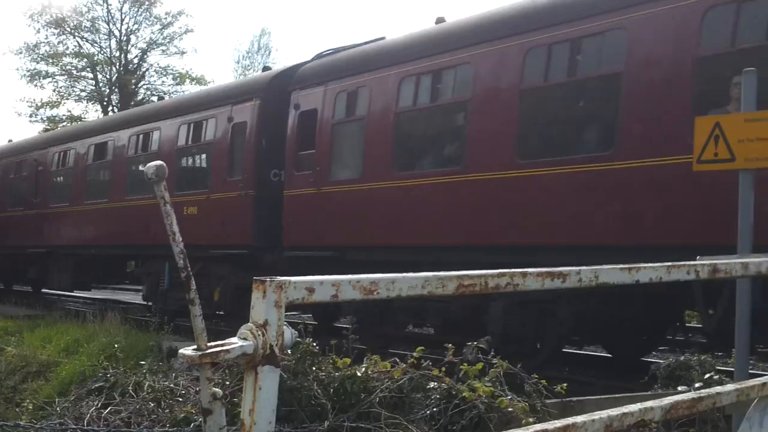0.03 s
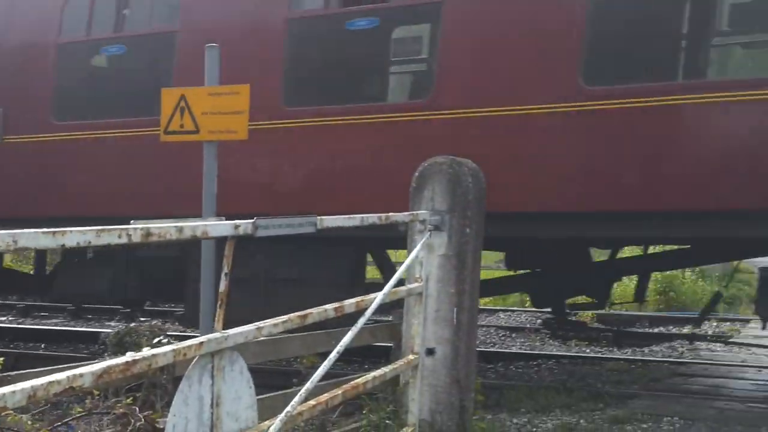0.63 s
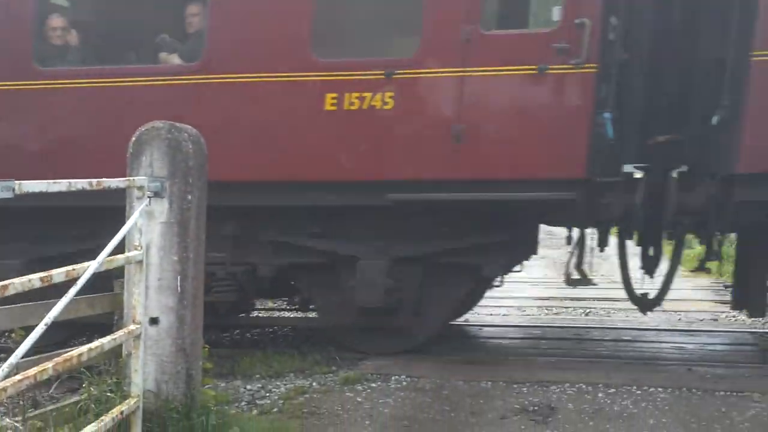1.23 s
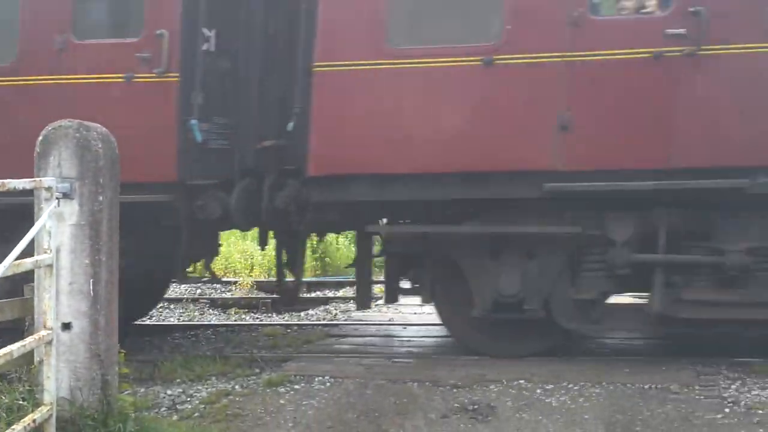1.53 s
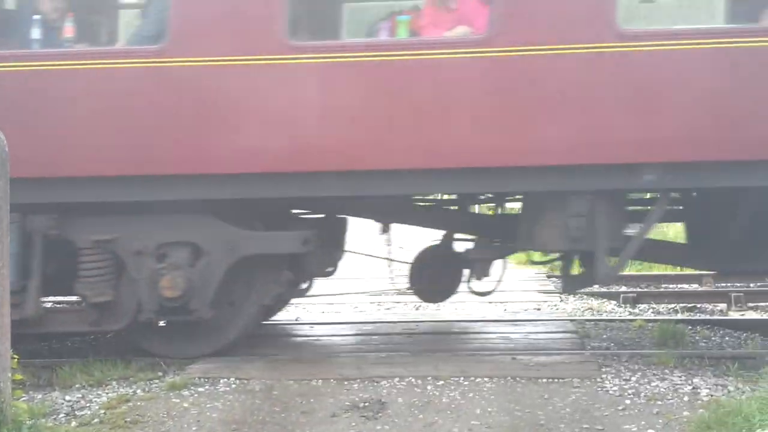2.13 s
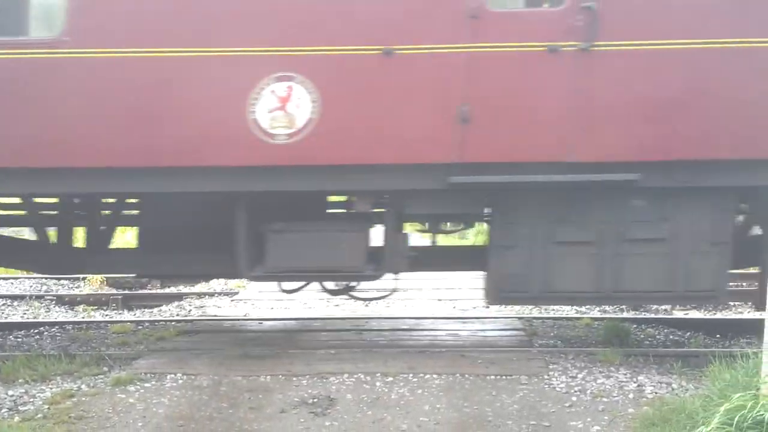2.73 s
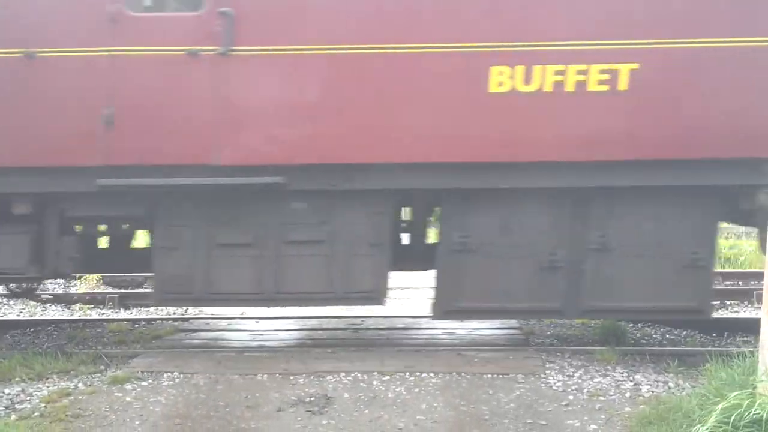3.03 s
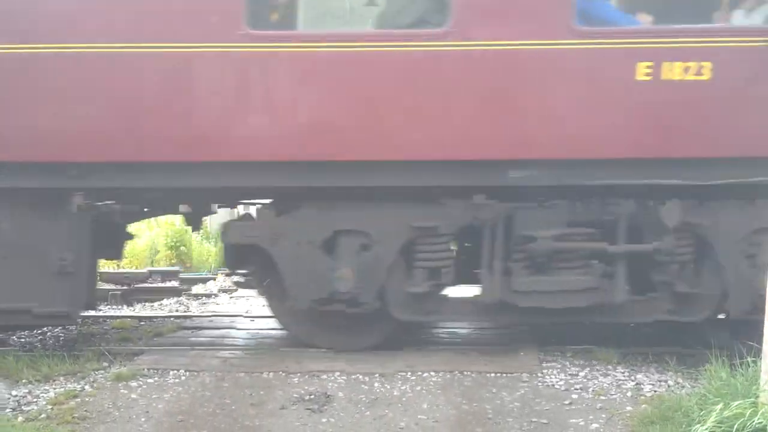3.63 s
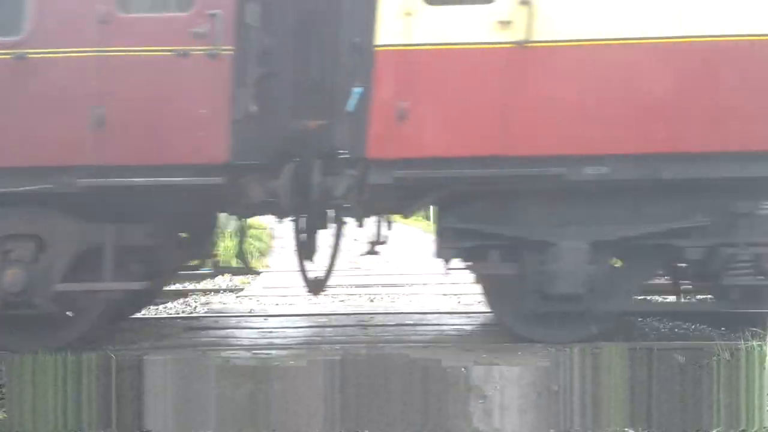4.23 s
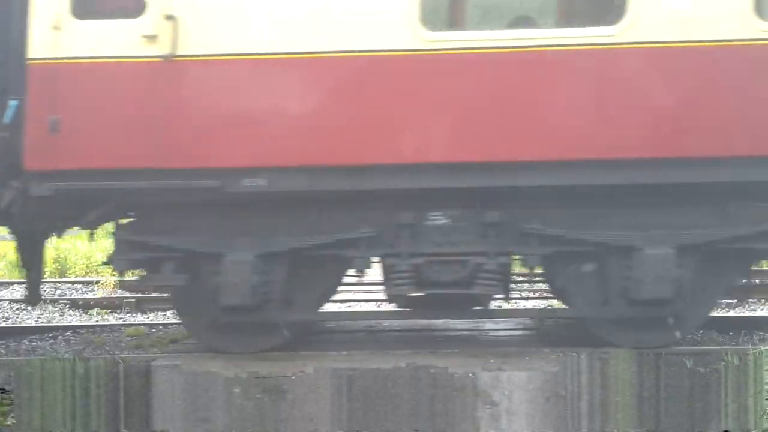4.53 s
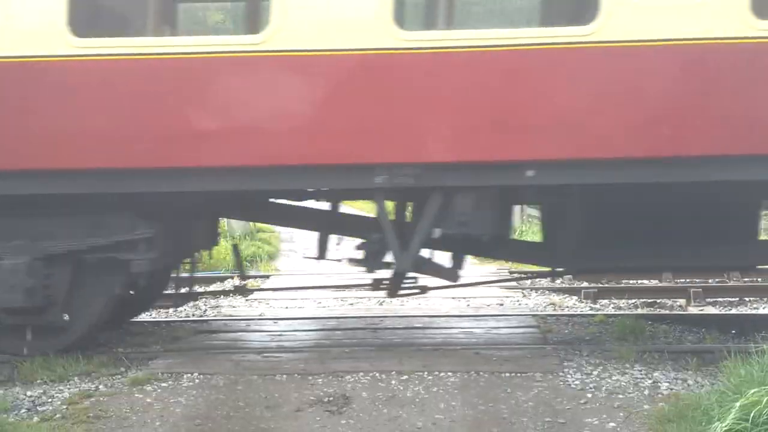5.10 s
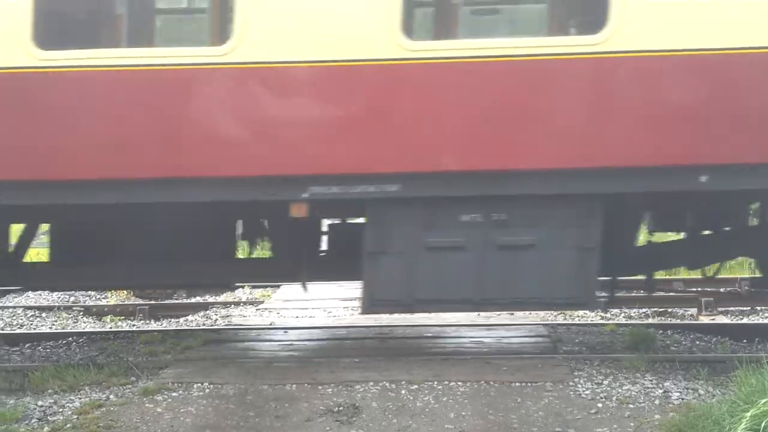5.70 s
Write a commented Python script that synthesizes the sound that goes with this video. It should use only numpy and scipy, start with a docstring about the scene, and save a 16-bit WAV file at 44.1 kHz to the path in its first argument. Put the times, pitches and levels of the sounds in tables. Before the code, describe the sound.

Railway carriages roll past outdoors, about three metres away, making a continuous low rumble and roar with a light, gritty steel hiss for nearly six seconds. Wheels strike a rail joint at about 0.3, 0.6, 1.1 and 1.5 seconds. Each hit is a sharp clack with a low thump and a short metallic ring, and the roar swells as each wheel passes. Around 2 seconds the clacking pauses and a low hum from the rails rises. A second group of four clacks lands at about 3.2, 3.6, 4.1 and 4.4 seconds, the first the hardest. Softer knocks from loose fittings, brief wheel scrapes and a few faint, thin squeaks are scattered throughout. From about 4.7 to 5.1 seconds come light knocks, low booms and short ringing wheel tones, then the rolling continues a little quieter to the end.

```python
"""Railway carriages roll over a level crossing a few metres away, at seven metres a second.
In the first second and a half four wheels strike a rail joint; each impact excites a clack and the
wheel's modes, whose pitch sinks by the Doppler effect. Near two seconds the rail's drone swells.
From about three seconds four more wheels strike; the last knocks and brief wheel tones follow.
Throughout, rolling contact makes the track roar and rumble and the treads hiss."""
import sys
import numpy as np
from scipy import signal
from scipy.io import wavfile
from scipy.ndimage import uniform_filter1d, minimum_filter1d

SR = 44100
rng = np.random.default_rng(int(sys.argv[2]) if len(sys.argv) > 2 else 0)


def wav_out(sig):
    """Save sig, one row per channel (or a flat mono array), as 16-bit PCM at SR to the path in sys.argv[1]."""
    wavfile.write(sys.argv[1], SR, np.round(np.clip(np.atleast_2d(sig).T, -1, 1) * 32767).astype(np.int16))


N = 254016
TIME = np.arange(N) / SR

# one row per wheel: joint_s, blow_db, blow_tilt_db_per_octave, hold_s, pitch_ratio, low_pitch_ratio,
# radial_pitch_ratio, clang_db, lead_hz, ring_tilt_db_per_octave, low_modes_db, ring_db, shake_db
WHEEL_PASSES = [(0.2572, -15.5, 0.2, 0.018, .984, .994, 1.0, -21, 3580, 3.5, 1, -36.5, -11.5),
                (.640, -16.5, 1.5, 0.026, .997, .985, 1.008, -24.5, 2024, 0, -.5, -27.5, -0.5),
                (1.1436, -12.5, 1.4, 0.011, .995, .98, 1.008, -24, 2080, -3.5, -0.5, -28, -6.5),
                (1.5227, -16, 0.6, 0.02, 1.0, .985, 0.92, -25.5, 2080, 1.5, .5, -28.5, 0),
                (3.1986, -10, 1.6, 0.0089, 1.012, 1.045, 1.02, -20, 2490, 1.5, -6, -28, -2.5),
                (3.569, -12.5, 1, 0.017, 1.012, 1.03, 1.024, -28, 2440, -0.5, 1, -25, 1.5),
                (4.0601, -15, 1.5, 0.015, 1.002, 1.02, .972, -20, 1840, -1.5, 2.5, -26, 2.5),
                (4.4296, -15, .5, 0.027, .987, .985, .966, -20, 1310, 0.5, 2.5, -28, 2)]
# modes of a steel wheel: pitch_hz, width_hz, rolling_db, struck_db
STEEL_MODES = [(1166, 240, -13, -22.5), (1319, 37.5, 1, 2.5), (1377, 43, -6.5, -11), (1828, 21.6, .5, -2.5),
               (2043, 31, -1.5, -12), (2424, 29, -4, -9.5), (2560, 48, -9.5, -12), (3112, 28, -9, -5.5),
               (3310, 20, -18, -17), (3590, 18, -14.5, -12.5), (3790, 37, -13, -14),
               (3864, 15, -12.5, -7.5), (4410, 53, -17, -13), (5400, 30, -20.5, -15.5),
               (6050, 30, -22.5, -11.5)]
# ring time of the struck track: frequency_hz, t60_s
TRACK_DECAY = [(60, 0.16), (200, 0.4), (600, 0.29), (2000, 0.15), (6000, 0.24), (8000, 0.21), (10500, 0.1)]
# modes of the rail end: pitch_hz, width_hz, gain_db
RAIL_END_MODES = [(577, 38, -0.5), (710, 85, -1.5), (940, 135, 0.5), (1460, 640, 5), (2080, 210, 1),
                  (3000, 190, -8), (4280, 220, -3), (5860, 140, 1)]
# modes of the track bed: pitch_hz, level_db, t60_s
BED_MODES = [(68, -21.5, 0.14), (135.6, -13.5, 0.18), (160, -8.5, 0.13), (285, -4, 0.035)]
# tread and flange slam onto the next rail and rebound: start_s, level_db, centre_hz
REBOUNDS = [(.2605, -14, 780), (.2615, -7, 2220), (.266, -14, 3380), (.283, -14.5, 3100), (.642, -17, 1500),
            (.649, -14, 2200), (.667, -12, 600), (1.146, -9, 875), (1.151, -6.5, 1320), (1.527, -11, 1440),
            (3.2005, -2.5, 680), (3.216, -10, 674), (3.573, -5, 1790), (3.575, -13, 746), (4.062, -7, 1390),
            (4.4315, -7, 700), (4.436, -7, 1300)]
# knocks of loose links: start_s, level_db, centre_hz
LINK_KNOCKS = [(.05, -28, 590), (.3805, -12.5, 705), (0.576, -16, 500), (0.737, -19, 745),
               (.895, -21, 1580), (1.09, -22, 1310), (1.268, -14.5, 650), (2.416, -25, 720),
               (2.743, -24, 570), (2.953, -20.5, 690), (3.322, -19, 635), (3.81, -21, 615),
               (3.928, -26, 2200), (4.163, -14, 565), (4.662, -19, 615), (4.763, -22.5, 4130),
               (5.079, -19, 720), (5.691, -21, 490)]
# a flange brushes the rail: peak_s, level_db
FLANGE_SCRAPES = [(.01, -28.5), (.41, -30.5), (.92, -31.5), (1.057, -31), (1.325, -23), (2.18, -25.5),
                  (3.304, -27)]
# resonances of the rubbing flange: pitch_hz, width_hz, gain_db
FLANGE_MODES = [(2060, 1450, -0.5), (3800, 1100, -5.5), (6130, 1800, -1.5)]
# the wheels ring out in brief hoarse tones, with a few thin high squeaks:
# peak_s, level_db, pitch_hz, half_length_s, width_hz
WHEEL_RINGS_AND_SQUEAKS = [(.01, -27, 1340, 0.02, 220), (0.32, -29, 2380, .016, 220),
                           (0.855, -40.5, 8330, .019, 120), (.995, -30, 2080, 0.022, 100),
                           (1.05, -34, 2540, .025, 160), (1.347, -32, 8340, 0.013, 120),
                           (1.798, -29, 1356, .04, 70), (2.0, -31, 2410, 0.017, 200),
                           (3.305, -25.5, 2430, 0.036, 300), (4.804, -25.5, 1828, 0.02, 70),
                           (4.846, -28, 1317, 0.05, 55), (4.995, -36, 3700, 0.036, 300),
                           (5.05, -33, 1800, .03, 60)]
# note of the rail's drone: time_s, pitch_hz
DRONE_NOTE = [(0, 189), (.45, 194), (.6, 186), (.8, 191), (1.02, 187), (1.2, 195), (1.42, 180), (1.7, 189),
              (1.95, 190), (2.2, 198), (2.4, 191), (2.7, 194), (2.86, 188), (3.26, 198), (3.55, 189),
              (3.85, 192), (4.3, 188), (4.5, 186), (4.6, 199), (4.8, 175), (5.1, 192), (5.76, 182)]
# brief swells of the low boom: peak_s, level_db, pitch_hz, half_length_s
BOOM_SURGES = [(.285, -23, 160, 0.015), (1.55, -32, 55, .05), (1.56, -23.5, 241.4, 0.073),
               (3.228, -17, 149.8, 0.016), (3.69, -23.5, 218, 0.034), (4.18, -21.5, 273, 0.024),
               (4.45, -30, 61.8, .03), (4.654, -26, 85.3, .014), (4.66, -17.5, 216, 0.021),
               (4.92, -16.5, 165, 0.033), (4.96, -19.5, 257.3, 0.02), (5.09, -17, 217.8, 0.029),
               (5.42, -24, 220.4, 0.044)]
# steady resonances of the rails: pitch_hz, width_hz, level_db
RAIL_RESONANCES = [(289, 10.8, -35), (3090, 920, -45.5)]
# spectra of joint, sleepers, rails, treads and ground: frequency_hz, relative_density_db
CLACK_SPECTRUM = [(30, -10), (70, -0.5), (150, 3.5), (300, -12), (430, 0.5), (600, 9), (900, -2.5),
                  (1500, -3.5), (2400, -5), (3600, -9.5), (4800, -11), (6400, -8), (8000, -25),
                  (11500, -15.5)]
SLEEPER_SPECTRUM = [(70, -35), (110, -10.5), (145, 2.5), (190, 4), (240, -2.5), (300, -11), (420, -28.5),
                    (800, -49)]
ROAR_SPECTRUM = [(170, -10.5), (280, 7), (400, 2), (560, -1), (750, -1), (1000, -13.5), (1250, -13.5),
                 (1600, -15), (2100, -11.5), (2800, -22.5), (4500, -26.5)]
HISS_SPECTRUM = [(1200, -3), (2200, 2), (3000, -1.5), (3900, -0.5), (4800, -7), (5600, -4.5), (6500, 2.5),
                 (7500, -8), (8700, -15), (10000, -1), (12000, -25.5)]
GROUND_SPECTRUM = [(20, -1.5), (35, 3), (60, 6.5), (100, 5.5), (160, -9.5), (300, -42.5)]
# envelopes of rail drone, tread hiss and ground rumble: time_s, gain_db
DRONE_ENVELOPE = [(0.0, -33), (.5, -37), (.6, -18), (.7, -24.5), (1.04, -25.5), (1.2, -19), (1.35, -32),
                  (1.73, -23), (1.92, -14.5), (2.05, -21), (2.17, -19.5), (2.32, -23.5), (2.69, -21),
                  (2.85, -27), (3.4, -30), (3.55, -17), (3.66, -26.5), (3.85, -30.5), (4.14, -27),
                  (4.25, -14.5), (4.42, -15.5), (4.55, -22), (4.7, -32), (4.82, -19), (5.0, -29),
                  (5.76, -29)]
HISS_ENVELOPE = [(0.0, -34), (0.99, -33.5), (1.88, -30.5), (2.77, -33.5), (3.37, -31.5), (4.67, -35),
                 (5.47, -38), (5.76, -37)]
GROUND_ENVELOPE = [(0.0, -35), (1.41, -33.5), (2.44, -40), (3.03, -35.5), (4.64, -36), (5.12, -41),
                   (5.76, -34.5)]

TRAIN_M_PER_S, SOUND_M_PER_S, TRACK_DISTANCE_M = 7.0, 343, 3.001
JOINT_LEAD_S = .42   # a wheel meets the joint this long before it is nearest
CONTACT_RISE_S = .0007


def wheels(blow_db, blow_t60, uneven_db, pits_db, afar_db):
    """Forced vibration: roughness and the joint drive each wheel's modes; Doppler shift lowers them."""
    mode_hz, widths, rolling_db, struck_db = np.transpose(STEEL_MODES)
    low, radial = mode_hz < 1600, abs(mode_hz - 2080) < 150
    out = np.zeros(N)
    for (s, db, _, _, pitch, low_pitch, radial_pitch,
         clang_db, lead_hz, tilt, low_db, ring_db, _) in WHEEL_PASSES:
        own_hz = mode_hz * np.select([low, radial], [low_pitch, radial_pitch], pitch)
        heard = np.hypot(nearness(s), from_db(afar_db))   # a far wheel still rings faintly
        rolling = heard * from_db(ring_db + uneven_db * drift(11.4) + pits_db * drift(30))
        force = rng.standard_normal(N) * (rolling + from_db(db + blow_db) * blow(s, 0.00037, blow_t60))
        gains = from_db(rolling_db + tilt * np.log2(mode_hz) + low_db * low)
        gains /= np.sqrt(np.sum(gains ** 2 * np.pi * widths / SR))   # unit force gives unit power
        ring = sum((-1) ** k * gains[k] * resonate(force, hz, widths[k]) for k, hz in enumerate(own_hz))
        slip_s = np.cumsum(.0022 * drift(16.24)) / SR   # the pitch wavers by 0.22 %
        ring = np.interp(TIME + slip_s - slip_s[int(s * SR)], TIME, ring)
        tilted_db = struck_db + 0.54 * tilt * np.log2(mode_hz / 2500)
        ring += clang(s, clang_db, lead_hz, own_hz, tilted_db)
        path_m = distance(s)
        delay_s = (path_m - path_m[int(s * SR)]) / SOUND_M_PER_S
        out += np.interp(TIME - delay_s, TIME, ring)
    return out


def clang(s, level_db, lead_hz, mode_hz, struck_db, lead_db=0.5, split_hz=24.7, twin_db=-2.5):
    """Mode splitting: a struck, turning wheel rings in beating pairs of partials with one leading note."""
    hz = np.append(mode_hz, lead_hz)
    gains = from_db(level_db + np.append(struck_db, lead_db))
    twin_hz = hz + split_hz * rng.choice([-1, 1], len(hz)) * rng.uniform(0.52, 2, len(hz))
    hz = np.append(hz, twin_hz)
    gains = np.append(gains, gains * from_db(twin_db))
    span, start = SR // 2, int(s * SR)
    # the rail's changing grip pulls every mode about
    waver_hz = 7.9 * drift(25)[rng.integers(0, N - span, (len(hz), 1)) + np.arange(span)]
    cycles = np.cumsum(hz[:, None] + waver_hz, axis=1) / SR + rng.random((len(hz), 1))
    tones = np.zeros(N)
    tones[start:start + span] = gains @ np.sin(2 * np.pi * cycles)
    return tones * blow(s, rise_s=0.0061, t60=0.35)


def clacks(crack_db, crack_t60, crack_hz, crack_octaves, tail_db):
    """Impact excitation: a wheel drops onto the next rail with a crack; each band decays at its own rate."""
    crack, tail = np.zeros(N), np.zeros(N)
    for hz, band in noise_bands(CLACK_SPECTRUM):
        octaves, t60 = np.log2(hz / crack_hz), at_hz(TRACK_DECAY, hz)
        crack += band / (1 + (octaves / crack_octaves) ** 2)
        tail += band * sum(from_db(db + tilt * octaves) * blow(s, 0.0015, t60, hold_s)
                           for s, db, tilt, hold_s, *_ in WHEEL_PASSES)
    crack *= sum(from_db(db) * blow(s + CONTACT_RISE_S, CONTACT_RISE_S, crack_t60)
                 for s, db, *_ in WHEEL_PASSES)
    tail = lowpass(tail, 9700, order=14)   # only the first contact reaches the highest treble
    return from_db(crack_db) * crack + from_db(tail_db) * tail


def rail_end(level_db, chatter_s, loss_db, count):
    """Inelastic rebound: each wheel chatters on the rail end in a few contacts that tend to weaken."""
    s, blow_db = np.transpose(WHEEL_PASSES)[:2, :, None]
    gaps_s = chatter_s * rng.uniform(.6, 1.4, (len(s), count))
    contact_s = s + 0.001052 + np.cumsum(gaps_s, axis=1) - gaps_s[:, :1]
    contact_db = blow_db + level_db - loss_db * np.arange(count)
    out = np.zeros(N)
    for k, (hz, width, db) in enumerate(RAIL_END_MODES):
        hits = np.zeros(N)
        hits[(contact_s * SR).astype(int)] = from_db(contact_db + db + rng.normal(0, 2.7, contact_s.shape))
        unit_height = SR / (2 * np.pi * width)
        out += (-1) ** k * resonate(hits, hz, width) * unit_height
    return out


def thumps(rise_s):
    """Damped oscillation: the track bed swings for a few cycles under each wheel's falling weight."""
    return sum(from_db(db) * blow(s, rise_s, t60)
               * np.sin(2 * np.pi * hz * rng.uniform(0.93, 1.102) * (TIME - s))
               for s, *_ in WHEEL_PASSES for hz, db, t60 in BED_MODES)


def thuds(rows, t60, octaves):
    """Heavy damping: each short impact gives a broad band of noise around its own pitch."""
    white, out = rng.standard_normal(N), np.zeros(N)
    for s, db, hz in rows:
        band = bandpass(white, hz * 2 ** (np.array([-.5, .5]) * octaves))
        out += from_db(db) * blow(s, CONTACT_RISE_S, t60) * steadied(band, span_s=0.0072)
    return out


def running_gear():
    """Impact and sliding friction: loose links knock and flanges brush the rail."""
    knocks = thuds(LINK_KNOCKS, t60=0.07, octaves=0.8)
    rubbing = rms_one(resonant_noise(FLANGE_MODES) * from_db(2.0 * drift(70)))
    return knocks + rubbing * sum(from_db(db) * swell(s, half_s=0.027) for s, db in FLANGE_SCRAPES)


def wheel_rings_and_squeaks():
    """Narrow-band resonance: the wheels ring out in brief hoarse tones, with a few thin high squeaks."""
    white, out = rng.standard_normal(N), np.zeros(N)
    for s, db, hz, half_s, width in WHEEL_RINGS_AND_SQUEAKS:
        note = resonate(resonate(white, hz, width), hz, width)
        out += from_db(db) * swell(s, half_s) * steadied(note, span_s=0.033)
    return out


def track(waver_hz, flutter_db):
    """Structural vibration: the rail drones over the sleepers' boom, which swells under each wheel."""
    drone = wavering_tone(in_time(DRONE_NOTE), waver_hz, rate=8.1)
    drone = from_db(in_time(DRONE_ENVELOPE)) * rms_one(drone * from_db(flutter_db * drift(33)))
    boom = steadied(rough_noise(SLEEPER_SPECTRUM, patchy_db=1.5, jolt_db=1.1, rate=14), span_s=0.18)
    surges = sum(from_db(db) * swell(s, half_s) * np.sqrt(2) * wavering_tone(hz, waver_hz=6, rate=20.5)
                 for s, db, hz, half_s in BOOM_SURGES)
    return drone + under_wheels(far_db=-28, near_db=-23.5) * boom + surges


def treads(scuff_db, sizzle_db, edge_db, grit_db):
    """Rolling friction: steel scuffs on steel, the rail sizzles with a metallic edge and grit ticks."""
    scuff = from_db(scuff_db) * rough_noise(HISS_SPECTRUM, patchy_db=2.5, jolt_db=1.6, rate=14.4)
    sizzle = from_db(sizzle_db + 1.3 * drift(23))
    sizzle *= rms_one(resonate(resonate(rng.standard_normal(N), 5390, 1300), 6250, 2500))
    edge = from_db(edge_db + 4.0 * drift(14))
    edge *= rms_one(resonate(resonate(rng.standard_normal(N), 6230, 420), 6380, 600))
    ticks = from_db(grit_db) * grit(per_s=190, spread_db=3.0, quality=28)
    return from_db(in_time(HISS_ENVELOPE)) * (scuff + sizzle + edge + ticks)


def grit(per_s, spread_db, quality):
    """Impulse response: each grain crushed under a tread rings briefly at one of many high pitches."""
    clicks = impulses(per_s) * from_db(spread_db * np.minimum(rng.exponential(1, N), 4))
    pitches = np.geomspace(2000, 7200, 12)
    chosen = rng.integers(0, len(pitches), N)
    ticks = sum(resonate(clicks * (chosen == k), hz, hz / quality) for k, hz in enumerate(pitches))
    return rms_one(lowpass(ticks, 7800, order=4))


def brake_rigging(per_s, spread_db, width_hz):
    """Free vibration: shaken brake rods ring after small random taps."""
    taps = impulses(per_s) * from_db(spread_db * rng.uniform(-0.91, 1, N))
    rod_hz = np.geomspace(430, 1050, 9)
    chosen = rng.integers(0, len(rod_hz), N)
    return rms_one(sum(resonate(taps * (chosen == k), hz, width_hz) for k, hz in enumerate(rod_hz)))


def ground_rumble():
    """Ground-borne vibration: the lowest part of the rolling noise."""
    rumble = rough_noise(GROUND_SPECTRUM, patchy_db=2.0, jolt_db=1.2, rate=9)
    return from_db(in_time(GROUND_ENVELOPE)) * steadied(rumble, span_s=.25)


def rail_song():
    """Sustained resonance: all the distant wheels keep the rails humming and grinding."""
    return resonant_noise(RAIL_RESONANCES)


def distance(joint_s):
    """Uniform motion: metres to the wheel that meets the joint at this time."""
    return np.hypot(TRACK_DISTANCE_M, TRAIN_M_PER_S * (TIME - joint_s - JOINT_LEAD_S))


def nearness(joint_s):
    """Directivity: a wheel radiates sideways, so its gain falls steeply from 1 straight ahead."""
    return (TRACK_DISTANCE_M / distance(joint_s)) ** 2.6


def under_wheels(far_db, near_db):
    """Incoherent addition: the whole train and each passing wheel add in power to give a gain."""
    swells = sum((from_db(near_db + shake_db) * nearness(s)) ** 2 for s, *_, shake_db in WHEEL_PASSES)
    return np.sqrt(from_db(far_db) ** 2 + swells)


def rough_noise(spectrum, patchy_db, jolt_db, rate):
    """Amplitude modulation: each band wavers alone, and bumps in the rail jolt them all together."""
    patches = sum(band * from_db(patchy_db * drift(rate)) for hz, band in noise_bands(spectrum))
    return rms_one(patches * from_db(jolt_db * drift(rate)))


def noise_bands(spectrum):
    """Spectral decomposition: third-octave (centre_hz, noise) pairs with unit total power."""
    edges = 18 * 2 ** (np.arange(30) / 3)
    white, bands = rng.standard_normal((2, N)), []
    for k, (low, high) in enumerate(zip(edges, edges[1:])):
        hz = np.sqrt(low * high)
        if high > spectrum[0][0] and low < spectrum[-1][0]:
            bands.append((hz, from_db(at_hz(spectrum, hz)) * bandpass(white[k % 2], [low, high])))
    total = np.sqrt(sum(np.mean(band ** 2) for hz, band in bands))
    return [(hz, band / total) for hz, band in bands]


def resonant_noise(modes):
    """Superposition of resonances, each driven by its own noise."""
    return sum(from_db(db) * rms_one(resonate(resonate(rng.standard_normal(N), hz, width), hz, width))
               for hz, width, db in modes)


def resonate(x, hz, width_hz):
    """Two-pole resonance with unit peak gain."""
    r = np.exp(-np.pi * width_hz / SR)
    gain = (1 - r * r) / 2
    return signal.lfilter([gain, 0, -gain], [1, -2 * r * np.cos(2 * np.pi * hz / SR), r * r], x + 1e-18)


def wavering_tone(hz, waver_hz, rate):
    """Frequency modulation of a sine by slow noise."""
    return np.sin(2 * np.pi * np.cumsum(hz + waver_hz * drift(rate)) / SR)


def impulses(per_s):
    """Shot noise: independent unit pulses of either sign."""
    return (rng.random(N) < per_s / SR) * rng.choice([-1, 1], N)


def drift(rate):
    """Random fluctuation of unit spread, mostly below `rate` hertz."""
    step, settle = 40, 2000
    r = np.exp(-2 * np.pi * rate * step / SR)
    slow = signal.lfilter([1], [1, -2 * r, r * r], rng.standard_normal(N // step + settle + 2))[settle:]
    return np.interp(np.arange(N) / step, np.arange(len(slow)), rms_one(slow))


def blow(s, rise_s, t60, hold_s=0):
    """Exponential decay after a quick rise and an optional hold."""
    out, start = np.zeros(N), int(s * SR)
    age = TIME[:min(N - start, SR // 2)]
    decay = np.exp(-np.log(1000) * np.maximum(age - hold_s, 0) / t60)
    out[start:start + len(age)] = (1 - np.exp(-age / rise_s)) * decay
    return out


def swell(s, half_s):
    """Bell-shaped envelope peaking at s."""
    return np.exp(-np.minimum(((TIME - s) / half_s) ** 2 / 2, 40))


def lowpass(x, hz, order):
    """Attenuation above a cutoff."""
    return signal.sosfilt(signal.butter(order, hz, fs=SR, output="sos"), x)


def bandpass(x, edges_hz):
    """Attenuation outside a band."""
    return signal.sosfilt(signal.butter(2, edges_hz, "band", fs=SR, output="sos"), x)


def steadied(x, span_s):
    """Normalisation to unit power over every span."""
    return x / np.sqrt(uniform_filter1d(x * x, max(int(span_s * SR), 1)) + 1e-9)


def rms_one(x):
    """Normalisation to unit mean power."""
    return x / np.sqrt(np.mean(x ** 2) + 1e-20)


def from_db(db):
    """Logarithmic level to amplitude ratio."""
    return 10 ** (np.asarray(db) / 20)


def in_time(curve):
    """Linear interpolation at every sample."""
    return np.interp(TIME, *np.transpose(curve))


def at_hz(points, hz):
    """Interpolation on a log-frequency axis."""
    frequencies, values = np.transpose(points)
    return np.interp(np.log(hz), np.log(frequencies), values)


def scene():
    """Superposition: rolling noise from ground to wheel, plus the impacts at the joint."""
    shaking = under_wheels(far_db=-25.5, near_db=-27.5)
    rolling = ground_rumble()
    rolling += shaking * rough_noise(ROAR_SPECTRUM, patchy_db=1.23, jolt_db=1.06, rate=9.8)
    rolling += shaking * from_db(-15.0) * brake_rigging(per_s=70, spread_db=2.0, width_hz=20)
    rolling += treads(scuff_db=-1.5, sizzle_db=-8.5, edge_db=-13.5, grit_db=-12.5)
    rolling += track(waver_hz=2.59, flutter_db=2.5)
    rolling += wheels(blow_db=-9.0, blow_t60=0.3, uneven_db=2.0, pits_db=2.0, afar_db=-21.5)
    joint = clacks(crack_db=1.5, crack_t60=0.023, crack_hz=1500, crack_octaves=4.5, tail_db=-2.5)
    joint += rail_end(level_db=-2.5, chatter_s=.004, loss_db=1.5, count=4)
    joint += thumps(rise_s=0.0053)
    joint += thuds(REBOUNDS, t60=0.031, octaves=0.94)
    rolling += running_gear() + wheel_rings_and_squeaks() + rail_song()
    # rolling contact is soft: only the blows at the joint reach the highest treble
    return (lowpass(rolling, 8900, order=16) + joint)[None]


def limiter(x, ceiling, release_db_per_s):
    """Peak limiting: the gain ducks just ahead of each excess and recovers within milliseconds."""
    over_db = 20 * np.log10(np.maximum(np.abs(x) / ceiling, 1))
    release_db = release_db_per_s * TIME
    held_db = np.maximum.accumulate(over_db + release_db, axis=-1) - release_db
    return x * uniform_filter1d(minimum_filter1d(from_db(-held_db), size=15), size=15)


def record(dry):
    """Peak and band limiting: peaks are held down and the treble is cut above 12 kHz."""
    limited = limiter(dry, ceiling=0.67, release_db_per_s=2199)
    return signal.sosfilt(signal.ellip(10, .1, 80, 12000, fs=SR, output="sos"), limited)


dry = scene()
out = record(dry)
wav_out(out)
```